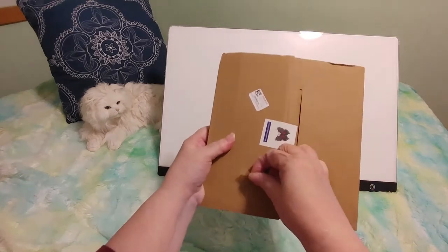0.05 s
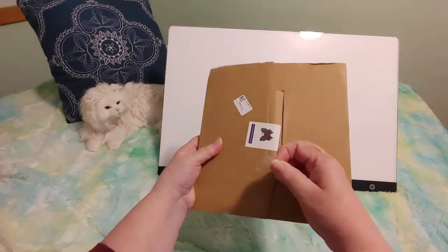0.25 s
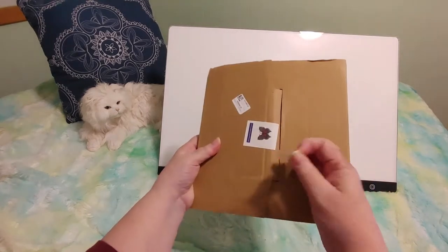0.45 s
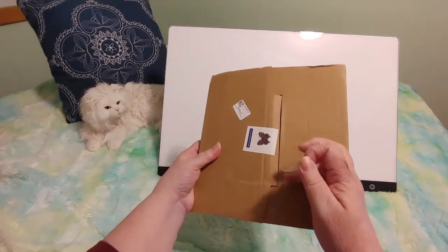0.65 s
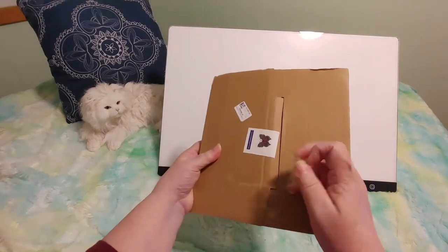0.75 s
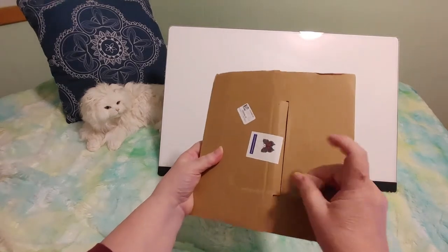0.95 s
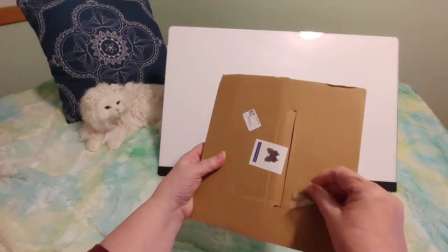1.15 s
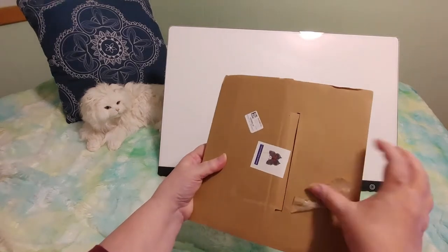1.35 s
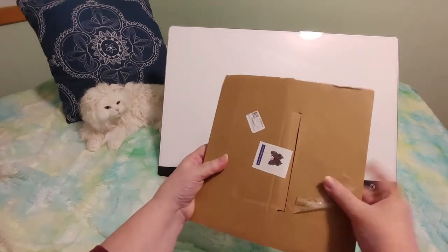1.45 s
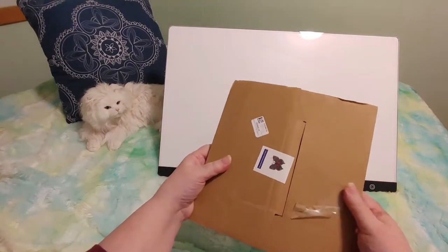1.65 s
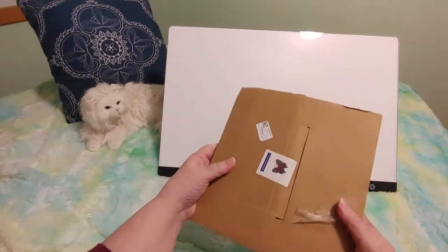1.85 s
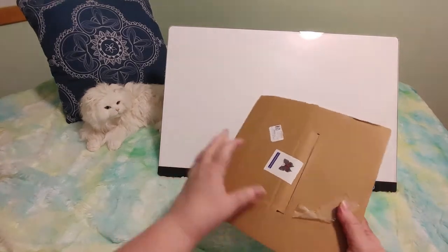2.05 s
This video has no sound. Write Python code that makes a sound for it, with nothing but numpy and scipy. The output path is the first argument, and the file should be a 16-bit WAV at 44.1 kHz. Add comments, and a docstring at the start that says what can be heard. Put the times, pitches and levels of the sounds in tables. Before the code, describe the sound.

Sticky tape is peeled from a cardboard mailer with a short rip, knocks and crisp clicks

```python
"""A strip of adhesive tape is peeled off a cardboard mailer held in the hands, in a small bedroom.
The tape slides with a scratchy hiss and rips free in one short burst: both are trains of random slips.
The film ticks and crinkles before, during and after the rip: gritty clicks and creases in a ringing band.
Knocks excite the modes of the mailer; fingers rub and brush it with coloured friction noise.
Short reflections and room tone surround the hands, whose sound reaches the right about 4 ms late."""
import sys
import numpy as np
from scipy import signal
from scipy.fft import rfft, irfft, next_fast_len
from scipy.io import wavfile
from scipy.ndimage import map_coordinates

SR = 44100
rng = np.random.default_rng(int(sys.argv[2]) if len(sys.argv) > 2 else 0)


def log_audio(samples):
    """Write samples as a 16-bit WAV file to the path given in sys.argv[1]."""
    # one column per channel
    frames = np.atleast_2d(samples).T
    # limit to full scale, then quantise
    limited = np.clip(frames, -1, 1)
    pcm = np.round(limited * 32767).astype(np.int16)
    wavfile.write(sys.argv[1], SR, pcm)


N = 92610
T = np.arange(N) / SR  # seconds

# The rip as the glue lets go. Each row: time in seconds, level in dB.
RIP_LEVEL = [(.226, -33), (.2345, -33), (.238, -19.5), (.245, -26), (.253, -22.5), (.265, -19),
             (.277, -26.5), (.288, -35), (.305, -45), (.33, -64)]
# Tone of the rip. Each row: frequency in Hz, gain in dB.
RIP_COLOUR = [(40, -45.5), (120, -16.5), (220, 5.5), (450, 3), (800, -1.5), (1200, 0.5), (2050, -8.5),
              (3000, 2.5), (5000, -2.5), (8300, -1), (9500, -14), (11500, -1), (13200, -22), (16000, -7)]
# Tape sliding over the card, a list for each of two pulls. Each row: time in seconds, level in dB,
# resonance in Hz.
SLIDE_PULLS = [
    [(0, -43.5, 7000), (.045, -45.5, 6200), (.075, -34, 4700), (.10, -41.5, 3900), (.12, -37, 3700),
     (.16, -47, 3500), (.19, -54, 3300), (.22, -46, 3000), (.24, -76, 3000)],
    [(1.29, -50, 4800), (1.315, -44.5, 4400), (1.385, -63, 3800), (1.405, -87, 3600)],
]
# Tone of the slide. Each row: frequency in Hz, gain in dB.
SLIDE_COLOUR = [(60, -46), (300, -30), (1500, -20.5), (2200, -19), (2800, -5), (5500, -5.5), (8000, -3),
                (9600, -11), (11500, -2), (13200, -12.5), (16000, -9.5)]
# Sharp ticks of the tape film. Each row: start in seconds, level in dB, ring in Hz, midrange in dB.
FILM_TICKS = [(.0068, -27.5, 7060, -14.5), (.050, -40, 6300, -19), (0.0734, -28.5, 4760, -15),
              (.210, -38.5, 8000, 3), (0.239, -17, 5000, 6), (0.352, -36, 5600, -2),
              (0.4253, -40.5, 8000, -3), (.5135, -50, 7740, -2), (0.5281, -30, 6640, -2.5),
              (.533, -36, 6460, -17), (0.565, -54, 7500, -9), (0.6517, -29.5, 7560, -10),
              (0.6553, -23.5, 8100, -8), (.6597, -31.5, 8800, 5), (0.7377, -37, 8100, 0),
              (0.739, -17, 8800, 4.5), (0.8117, -41, 8000, -11), (.820, -21, 8900, -9),
              (0.832, -34.5, 8050, 16), (0.912, -26.5, 5950, -1.5), (0.9331, -17, 8530, 0),
              (.9808, -28, 8500, -5), (1.0231, -24.5, 6740, -1), (1.0393, -30, 8500, -2.5),
              (1.0535, -22, 8200, -31), (1.0564, -33, 2780, 6), (1.21, -38, 6600, -1),
              (1.2232, -31, 6100, 2), (1.2749, -19, 7200, -3), (1.308, -36, 4340, -10),
              (1.4485, -59, 7700, -9), (1.478, -44.5, 7200, -18), (1.5772, -39, 4500, -11),
              (1.634, -47.5, 6160, -5)]
# Clusters of tiny creases. Each row: start in seconds, length in seconds, level in dB at the start,
# ring in Hz, midrange in dB.
FILM_CRINKLES = [(0.089, 0.019, -54, 4560, 0), (0.523, 0.053, -45.5, 7350, -13),
                 (0.656, 0.025, -37.5, 8300, -12), (0.735, 0.016, -30.5, 7800, -7),
                 (0.816, 0.028, -37.5, 8700, -24), (0.913, 0.068, -49, 3020, 7),
                 (1.02, .04, -50, 7450, -11), (1.291, 0.073, -43, 7700, -10)]
# Tone of the tape film. Each row: frequency in Hz, gain in dB.
FILM_COLOUR = [(40, -37), (150, -18.5), (400, -13.5), (1000, -12.5), (2000, -5.5), (3000, -3.5), (5500, -4),
               (8200, -2.5), (9600, -11.5), (11800, -5), (13200, -25), (16000, -18.5)]
# Flexing and knocking of the mailer. Each row: start in seconds, level in dB (before a common 4 dB lift),
# bass in dB, softness as a low-pass in Hz, strongest resonance in Hz.
MAILER_KNOCKS = [(0.2384, -13, -21, 6000, 1260), (0.2497, -29, 0, 4920, 725),
                 (0.273, -8.5, 1.5, 4440, 1510), (0.449, -47, -3, 700, 440), (.651, -35.5, 3.5, 1950, 1110),
                 (0.7387, -22, 0, 3500, 980), (0.814, -38.5, -7, 1500, 460),
                 (0.9344, -33.5, 0.5, 4000, 1010), (1.0235, -56, -10, 5000, 1720),
                 (1.0572, -38, -12, 2960, 1080), (1.2235, -43.5, -12, 2500, 870),
                 (1.312, -47, -15, 1500, 380), (1.577, -34.5, 3.5, 2600, 717),
                 (1.581, -29.5, 12, 1820, 199), (1.584, -39, -10, 1210, 435)]
# Modes of the mailer. Each row: frequency in Hz, typical level in dB, decay by 60 dB in seconds.
MAILER_MODES = [(185, -8, 0.03), (230, -11.5, 0.082), (337, -7, 0.097), (441, 0, 0.04), (604, -4.5, 0.11),
                (712.7, -4.5, 0.071), (934.3, 2, 0.11), (1070, -4.5, .06), (1184, 5, 0.04),
                (1227.5, 2.5, 0.023), (1460, -7.5, 0.035), (1722, 0.5, 0.066)]
# Tone of the papery thud. Each row: frequency in Hz, gain in dB.
THUD_COLOUR = [(30, -53.5), (60, -40.5), (110, -21.5), (185, -4), (380, -1.5), (560, -1), (1100, -1),
               (1600, -3), (2100, -10.5), (3000, -9), (8000, -5), (15000, -14)]
# Strokes of a fingertip on the card. Each row: start in seconds, length in seconds, level in dB,
# resonance at the start in Hz, resonance at the end in Hz.
FINGER_RUBS = [(0.015, 0.11, -48, 1320, 1080), (0.098, 0.06, -44.5, 1470, 1140),
               (.225, 0.034, -33, 1200, 1220), (0.322, 0.064, -41, 1070, 1090),
               (0.354, 0.087, -48, 2150, 1900), (0.523, 0.021, -50.5, 1200, 1100),
               (0.599, 0.11, -51, 1260, 1130), (0.703, 0.078, -46.5, 1290, 1320),
               (0.751, 0.1, -42, 1400, 1170), (0.842, 0.11, -52, 1080, 1200),
               (0.903, 0.11, -52.5, 1300, 1180), (1.034, 0.064, -52, 1110, 925),
               (1.136, 0.12, -52.5, 970, 825), (1.302, 0.043, -46.5, 1450, 1350),
               (1.319, 0.043, -45.5, 1180, 1070), (1.355, 0.047, -52, 960, 930),
               (1.583, 0.061, -52.5, 1000, 1000), (1.922, 0.035, -57, 1150, 1130)]
# Tone of the rubbing. Each row: frequency in Hz, gain in dB.
RUB_COLOUR = [(40, -35.5), (130, -15), (205, -6.5), (320, -16), (440, -4.5), (620, -22), (880, 0),
              (1500, -4.5), (2000, -17.5), (2700, -10), (5000, -20.5), (14000, -33.5)]
# Skin brushing over film and paper. Each row: time in seconds, level in dB.
BRUSH_LEVEL = [(.30, -37), (.42, -84.5), (.48, -74.5), (.56, -51.5), (.60, -59), (.63, -51), (.72, -57),
               (.78, -42.5), (.87, -50), (.97, -49.5), (1.10, -53), (1.16, -65.5), (1.225, -47.5),
               (1.26, -58), (1.32, -58), (1.39, -50), (1.415, -99.5), (1.45, -87), (1.485, -66),
               (1.51, -91.5), (1.575, -68), (1.61, -58), (1.69, -67.5), (1.78, -65.5), (1.84, -56),
               (1.88, -62.5), (1.915, -55.5), (1.99, -55), (2.045, -64.5), (2.09, -106.5)]
# Tone of the brushing. Each row: frequency in Hz, gain in dB.
BRUSH_COLOUR = [(60, -25), (220, -8), (650, -5.5), (1100, -5.5), (1800, -2.5), (3000, -5), (4300, -0.5),
                (5500, -7), (8100, 6), (9600, -8), (11800, -2), (13200, -16), (16000, -18.5)]
# Decay of the room. Each row: frequency in Hz, decay by 60 dB in seconds.
ROOM_DECAY = [(120, 0.048), (400, 0.079), (1000, 0.15), (3000, 0.1), (8000, 0.17), (15000, 0.06)]
# Strength of the room sound. Each row: frequency in Hz, gain in dB.
ROOM_SEND = [(100, -15.5), (400, -7), (1000, -13.5), (3000, -1.5), (8000, -11.5), (15000, -1)]
# Direct sound at the right microphone. Each row: frequency in Hz, gain in dB.
RIGHT_GAIN = [(200, -2), (1000, -3), (4000, -3.5), (12000, -4)]
# Tone of the background. Each row: frequency in Hz, gain in dB.
FLOOR_COLOUR = [(25, -4), (100, -1.5), (220, 6.5), (450, -1), (1000, 4.5), (2000, -10), (8000, -8),
                (16000, -26.5)]

SLIDE_PEAK_DB, SLIDE_Q = 10, 13
TICK_T60_S, TICK_GRIT, TICK_Q = 0.007, 0.34, 5
CRINKLE_FADE_DB = 3
FILM_RING_DB, MIDRANGE_HZ, TREBLE_HZ = 7.5, 2500, 7000
THUD_T60_S, THUD_GRIT, MODES_DB, BASS_HZ = 0.037, 0.27, -7.5, 500
KNOCK_PEAK_DB, KNOCK_Q = 1.5, 5
RUB_PEAK_DB, RUB_Q, RUB_ROUNDNESS, RUB_FLUTTER_DB = 5.5, 5.9, 0.72, 2
BRUSH_FLUTTER_DB = 1.8
EARLY_DB, EARLY_T60_S = -8, 0.035
SHIFT_S = 0.1  # the hands move, so the reflections change this often
RIGHT_LAG_S = 0.00394
FLOOR_DB = -68.5
TOP_HZ = 15750


def rip():
    """The glue lets go in a dense train of slips, coloured by film and card."""
    tearing = coloured(slips(rate=2200, spread_db=5, hiss=0.343), RIP_COLOUR)
    return level(RIP_LEVEL) * unit(tearing)


def slide():
    """A scratchy stick-slip hiss whose resonance falls as the free length of tape grows."""
    out = np.zeros(N)
    for pull in SLIDE_PULLS:
        times, _, hz = np.transpose(pull)
        friction = slips(rate=1800, spread_db=4, hiss=0.43)
        scratch = swept(friction, times, hz, SLIDE_PEAK_DB, SLIDE_Q)
        out += level(pull) * unit(coloured(scratch, SLIDE_COLOUR))
    return out


def ticks():
    """The film buckles: each tick rings for a few cycles in its own band."""
    out = np.zeros(N)
    t = np.arange(SR // 20) / SR
    for start, db, hz, mid_db in FILM_TICKS:
        buckle = snap(t, TICK_T60_S, TICK_GRIT)
        add(out, start, amp(db) * burst(film(buckle, hz, mid_db, TICK_Q)))
    return out


def crinkles():
    """Runs of tiny creases in the film that start at once, fade a little and stop."""
    out = np.zeros(N)
    for start, length, db, hz, mid_db in FILM_CRINKLES:
        n = int(length * SR)
        folds = slips(rate=840, spread_db=3, hiss=0.13)[:n]
        creases = unit(film(folds, hz, mid_db, q=2.5))
        add(out, start, creases * amp(db - CRINKLE_FADE_DB * np.arange(n) / n))
    return out


def film(x, hz, mid_db, q):
    """The tape's own colour: a bright crackle with one ringing band and more or less midrange."""
    x = coloured(x, FILM_COLOUR)
    x = coloured(x, [(MIDRANGE_HZ, mid_db), (TREBLE_HZ, 0)])
    return filtered(x, lambda f: 1 + amp(FILM_RING_DB) * resonance(f, hz, q))


def mailer_modes(t):
    """The card's bending modes ring together, each with a random phase and a slightly random level."""
    ring = np.zeros(len(t))
    for hz, db, t60 in MAILER_MODES:
        decay = amp(db + 2 * rng.normal() - 60 * t / t60)
        ring += decay * np.sin(2 * np.pi * (hz * t + rng.random()))
    return ring * (1 - np.exp(-t / 0.0013))  # soft onset


def knocks():
    """The mailer flexes or is tapped: a papery thud and short modes; a broad push has more bass."""
    out = np.zeros(N)
    t = np.arange(SR // 5) / SR
    for start, db, bass_db, soft_hz, main_hz in MAILER_KNOCKS:
        thud = burst(coloured(snap(t, THUD_T60_S, THUD_GRIT), THUD_COLOUR))
        x = thud + amp(MODES_DB) * burst(mailer_modes(t))
        x = coloured(x, [(BASS_HZ / 2, bass_db), (BASS_HZ * 2, 0)])

        def contact(f):
            """One stressed resonance, with less treble for a soft touch."""
            peak = 1 + amp(KNOCK_PEAK_DB) * resonance(f, main_hz, KNOCK_Q)
            return peak / (1 + 1j * f / soft_hz)
        add(out, start, amp(db + 4) * burst(filtered(x, contact)))
    return out


def rubs():
    """Each fingertip drag swells and fades, with a hollow card resonance that shifts with the finger."""
    out = np.zeros(N)
    for start, length, db, from_hz, to_hz in FINGER_RUBS:
        friction = coloured(slips(rate=1200, spread_db=2, hiss=0.4), RUB_COLOUR)
        drag = swept(friction, [start, start + length], [from_hz, to_hz], RUB_PEAK_DB, RUB_Q)
        progress = np.clip((T - start) / length, 0, 1)
        swell = abs(np.sin(np.pi * progress)) ** RUB_ROUNDNESS
        out += amp(db) * swell * unit(drag)
    return out * amp(RUB_FLUTTER_DB * wobble(60.17))


def brush():
    """Skin brushing lightly over film and paper gives a grainy hiss."""
    grain = coloured(slips(rate=1500, spread_db=0, hiss=0.96), BRUSH_COLOUR)
    return level(BRUSH_LEVEL) * amp(BRUSH_FLUTTER_DB * wobble(90)) * unit(grain)


def slips(rate, spread_db, hiss):
    """Stick-slip friction: random tiny impulses of uneven size, rate a second, over a smooth hiss."""
    spread = np.clip(rng.standard_normal(N), -1.5, 1.5)
    sizes = amp(spread_db * spread) * rng.choice([-1, 1], N)
    impulses = (rng.random(N) < rate / SR) * sizes
    return unit(unit(impulses) + hiss * rng.standard_normal(N))


def snap(t, t60, grit):
    """One sudden slip and the gritty settling after it."""
    x = grit * rng.standard_normal(len(t)) * amp(-60 * t / t60)
    x[0] = 1
    return x


def nearby(x):
    """Treble scattered by the hands and the mailer itself, within a few milliseconds."""
    t = np.arange(SR // 40) / SR

    def scatter():
        h = rng.standard_normal(len(t)) * amp(-60 * t / EARLY_T60_S)
        return h / np.linalg.norm(h)
    treble = filtered(x, lambda f: 1j * f / (1j * f + 2000))  # high-pass at 2 kHz
    return amp(EARLY_DB) * reflected(treble, scatter)


def room(x):
    """A small furnished room: a short diffuse tail that decays at its own rate in each band."""
    def tail():
        hz, t, z = signal.stft(rng.standard_normal(SR // 4), SR, nperseg=256)
        decay = amp(-60 * t / along(ROOM_DECAY, hz)[:, None])
        h = signal.istft(z * decay, SR, nperseg=256)[1]
        h = h * (1 - np.exp(-np.arange(len(h)) / SR / 0.0016))  # builds up after the direct sound
        return h / np.linalg.norm(h)
    return reflected(coloured(x, ROOM_SEND), tail)


def reflected(x, response):
    """x convolved in overlapping pieces, each with a newly drawn response."""
    out = np.zeros(N)
    hop = round(SHIFT_S * SR)
    for i in range(0, N, hop):
        fade = np.clip(1 - abs(np.arange(N) - i) / hop, 0, 1)
        start = max(i - hop, 0)
        piece = (x * np.sqrt(fade))[start:i + hop]
        add(out, start / SR, signal.fftconvolve(piece, response()))
    return out


def room_tone():
    """Steady background: coloured noise, independent in the two channels."""
    return amp(FLOOR_DB) * unit(coloured(rng.standard_normal((2, N)), FLOOR_COLOUR))


def amp(db):
    """Decibels to linear gain."""
    return 10 ** (np.asarray(db) / 20)


def unit(x):
    """Scaled to an RMS of one."""
    return x / np.sqrt(np.mean(x ** 2) + 1e-20)


def burst(x):
    """Scaled to the energy of one millisecond at full level."""
    return x * np.sqrt(SR / 1000 / np.sum(x ** 2))


def along(points, hz):
    """Values read from (Hz, value) points on a log frequency axis."""
    f, v = np.transpose(points)
    return np.interp(np.log(hz + 1), np.log(f), v)


def level(rows):
    """Gain per sample from rows that begin with seconds and dB, silent outside them."""
    s, db = np.transpose(rows)[:2]
    return amp(np.interp(T, s, db)) * (T >= s[0]) * (T <= s[-1])


def wobble(rate):
    """A smooth random curve, rate knots a second."""
    return map_coordinates(rng.standard_normal(2048), [T * rate], mode="wrap")


def filtered(x, response):
    """x times a complex response of frequency."""
    n = x.shape[-1]
    m = 2 * next_fast_len(n // 2 + 2048)  # padded, even length
    return irfft(rfft(x, m) * response(np.fft.rfftfreq(m, 1 / SR)), m)[..., :n]


def coloured(x, points):
    """x through a causal minimum-phase filter with the given (Hz, dB) shape."""
    def response(hz):
        cepstrum = irfft(np.log(amp(along(points, hz))))
        half = len(cepstrum) // 2
        cepstrum[1:half] *= 2  # fold onto positive time
        cepstrum[half + 1:] = 0
        return np.exp(rfft(cepstrum))
    return filtered(x, response)


def resonance(f, hz, q):
    """Complex band-pass response of one resonance, with a peak of one at hz."""
    damping = 1j * f * hz / q
    return damping / (hz * hz - f * f + damping)


def swept(x, times, hz, peak_db, q):
    """x plus its passage through a resonance that moves along (times, hz)."""
    f, t, z = signal.stft(x, SR, nperseg=512)
    peak = 1 + amp(peak_db) * abs(resonance(f[:, None], np.interp(t, times, hz), q))
    return signal.istft(z * peak, SR, nperseg=512)[1][:N]


def add(track, s, x):
    """Mix x into track at time s in seconds."""
    i = max(round(s * SR), 0)
    track[i:i + len(x)] += x[:N - i]


def scene():
    """All sounds come from the hands; each microphone hears its own reflections and room tone."""
    hands = rip() + slide() + ticks() + crinkles() + knocks() + rubs() + brush()
    left = hands + nearby(hands) + room(hands)
    right = coloured(hands, RIGHT_GAIN) + nearby(hands) + amp(-1) * room(hands)
    right = filtered(right, lambda f: np.exp(-2j * np.pi * f * RIGHT_LAG_S))  # pure delay
    return np.array([left, right]) + room_tone()


def record(dry):
    """A very steep low-pass removes what lies above the band limit."""
    return filtered(dry, lambda hz: 1 / (1 + (hz / TOP_HZ) ** 120))


dry = scene()
out = record(dry)
log_audio(out)
```